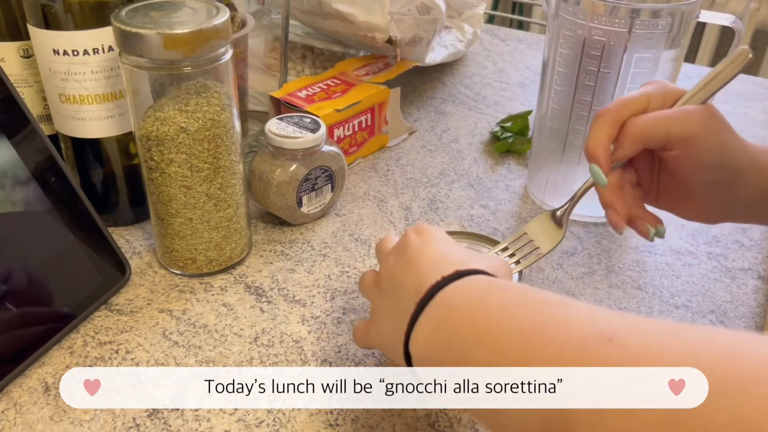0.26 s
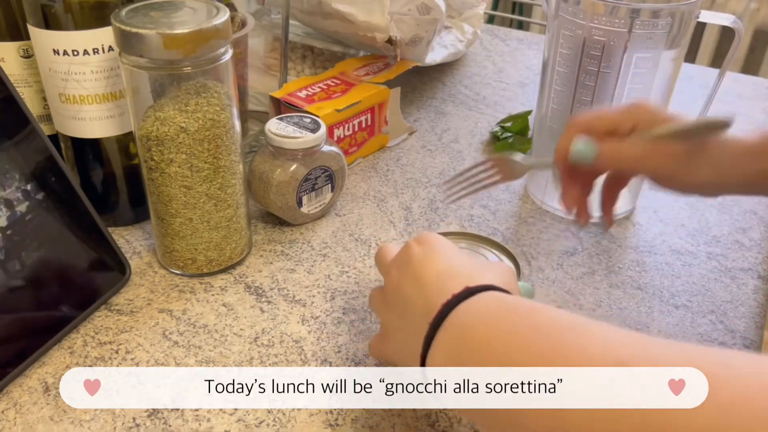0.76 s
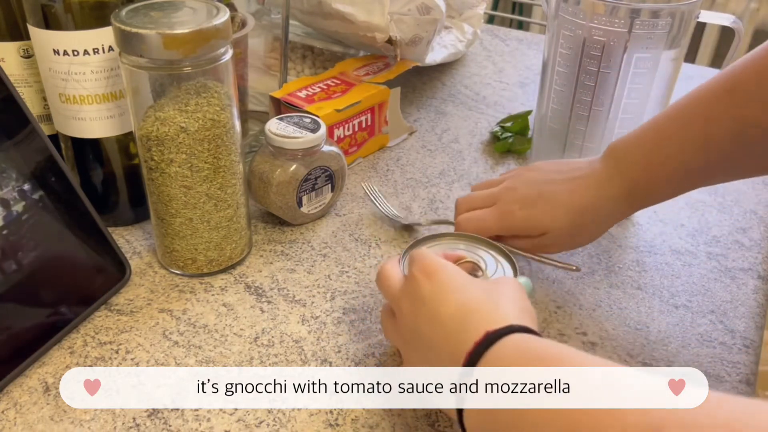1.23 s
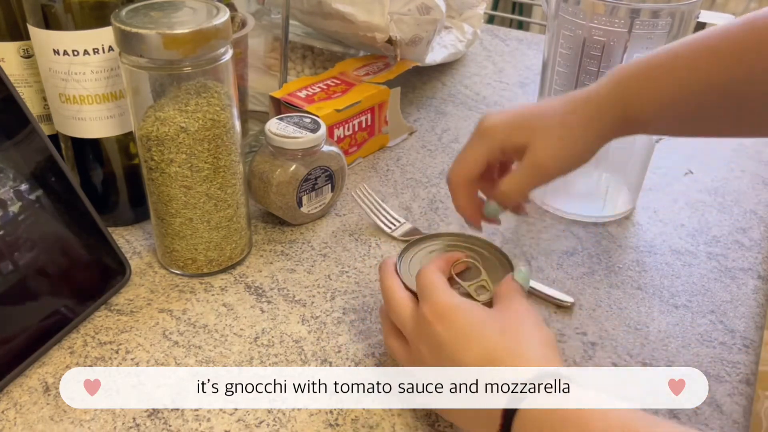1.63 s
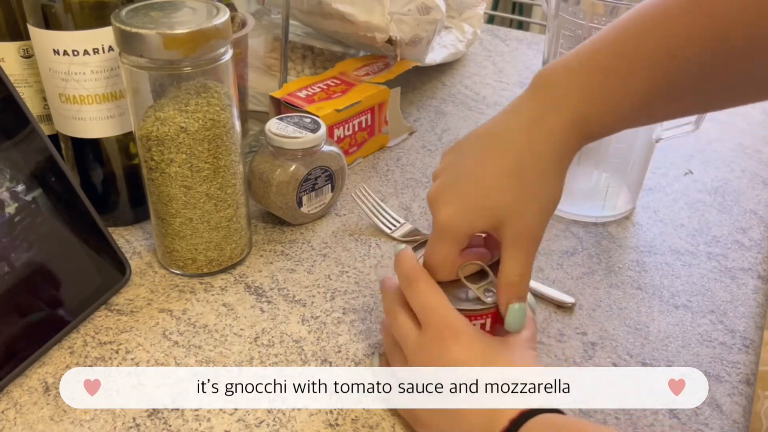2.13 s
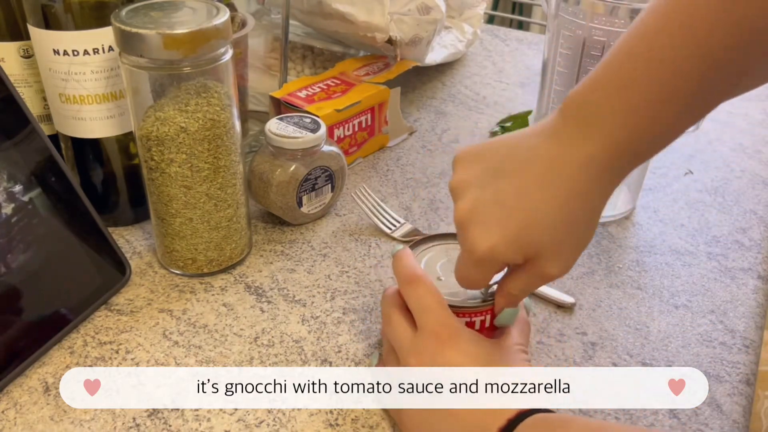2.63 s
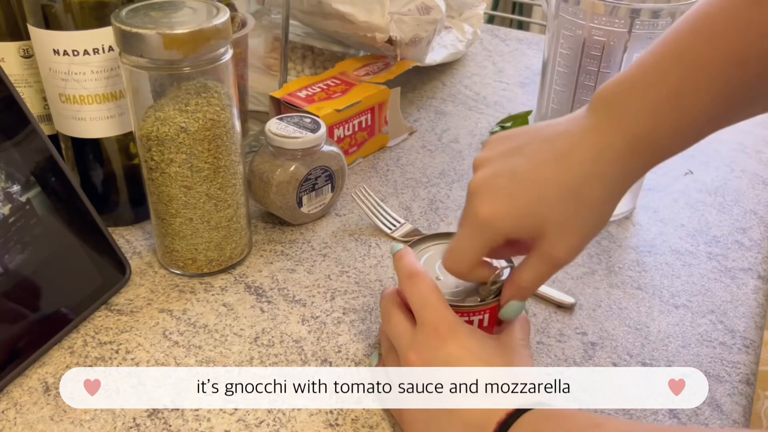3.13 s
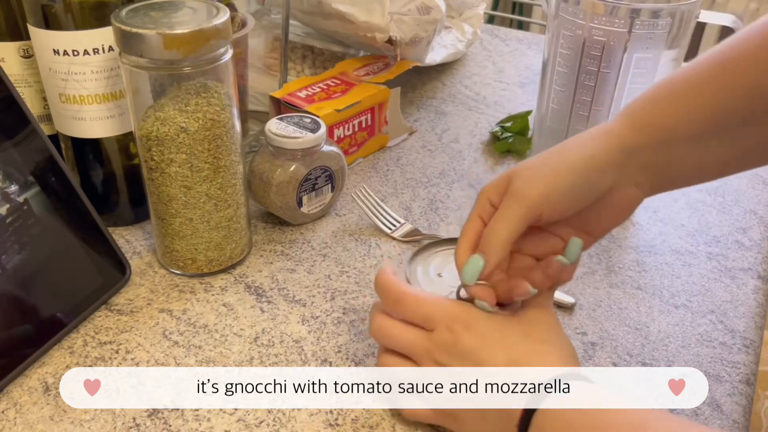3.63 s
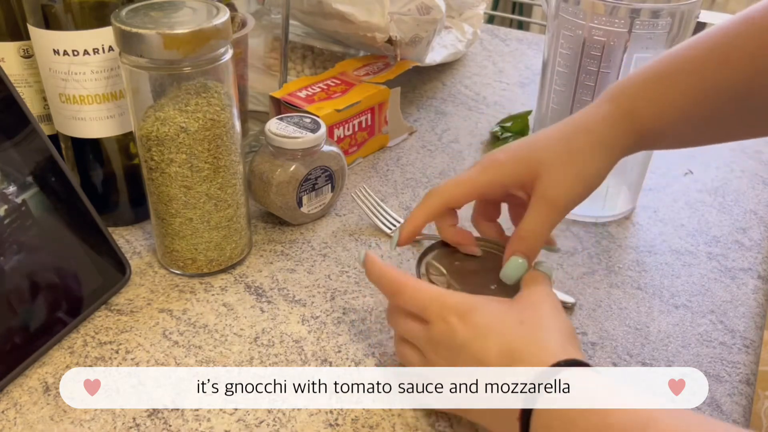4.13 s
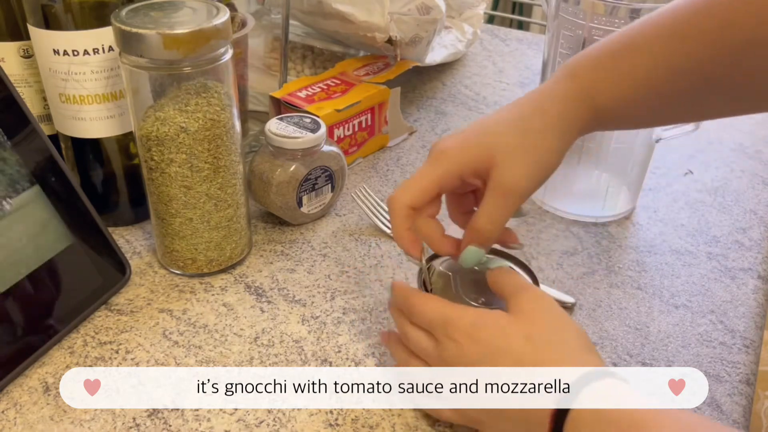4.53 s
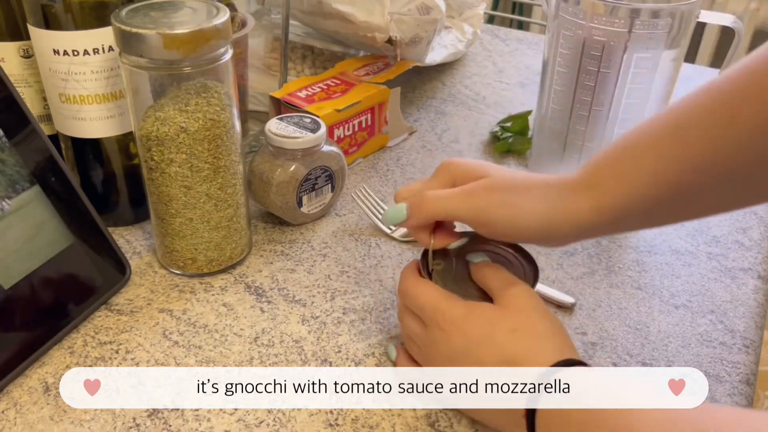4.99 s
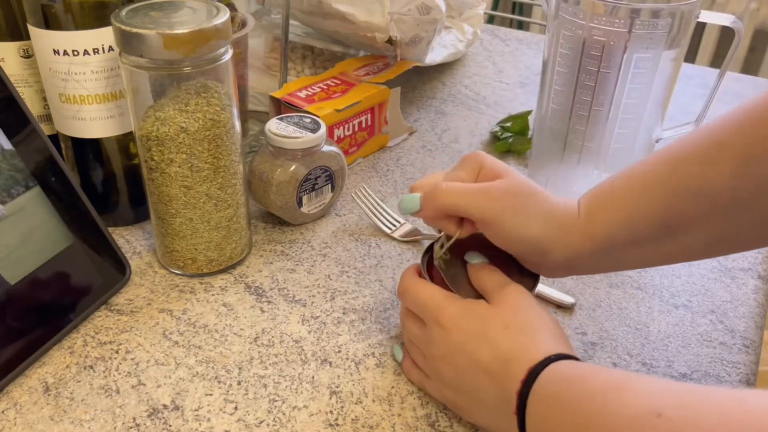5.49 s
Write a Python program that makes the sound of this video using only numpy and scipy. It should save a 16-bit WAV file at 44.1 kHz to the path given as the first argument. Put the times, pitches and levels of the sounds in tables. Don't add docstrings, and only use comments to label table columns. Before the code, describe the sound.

Phone-close sound of hands opening a can on a stone counter. Light metallic ticks come first, a steel fork clatters down and drags with a thin ring, and the can is struck sharply. The pull ring snaps and ticks on the lid while the can scrapes across grit. A short puff of air and dull thud end it, with small creaking slips and a short room echo.

```python
import sys
import numpy as np
from scipy import signal
from scipy.fft import rfft, irfft, next_fast_len
from scipy.io import wavfile
from scipy.ndimage import uniform_filter1d

SR = 44100
rng = np.random.default_rng(int(sys.argv[2]) if len(sys.argv) > 2 else 0)


def unload_wav(signal):
    wavfile.write(
        sys.argv[1],
        SR,
        np.round(np.clip(np.atleast_2d(signal).T, -1, 1) * 32767).astype(np.int16),
    )


def how_loud(loudness_db):
    steps = np.asarray(loudness_db, float) / 20
    return 10 ** steps


N = 253575


def unit(x):
    return x / np.sqrt(np.mean(x ** 2) + 1e-20)


def peak(x):
    return x / np.max(np.abs(x))


def add(out, start_s, sound):
    out[round(start_s * SR):][:len(sound)] += sound


def decay(t, t60_s):
    return how_loud(-60 * t / t60_s)


def along(points, hz):
    f, v = np.transpose(points)
    return np.interp(np.log(hz + 1), np.log(f + 1), v)


def curves(rows):
    (s, *columns), t = np.transpose(rows), np.arange(N) / SR
    return [how_loud(np.interp(t, s, db, left=-200, right=-200)) for db in columns]


def swells(rows):
    t = np.arange(0, N + 32, 32) / SR
    power = 0
    for s, db, rise, fall in rows:
        distance = np.maximum((s - t) / abs(rise), (t - s) / abs(fall))
        power = power + how_loud(2 * db - 39.6 * distance)
    return np.interp(np.arange(N) / SR, t, np.sqrt(power))


def filtered(x, response):
    m = next_fast_len(x.shape[-1] + SR // 2)
    return irfft(rfft(x, m) * response(np.fft.rfftfreq(m, 1 / SR)), m)[..., :x.shape[-1]]


def shaped(x, points):
    return filtered(x, lambda f: how_loud(along(points, f)))


def body(modes):
    def response(f):
        return sum((-1) ** k * how_loud(db) * 1j * f * w / (c * c - f * f + 1j * f * w)
                   for k, (c, w, db) in enumerate(modes))
    return response


def soft(response, top_hz):
    return lambda f: response(f) / (1 + 1j * f / top_hz) ** 3


def struck(modes, place, hz, sharp, boost_db):
    others = body([(c, w, db + 2.8 * p) for (c, w, db), p in zip(modes, place)])
    favoured = body([(hz, hz / sharp, boost_db)])
    clack = body([(1.3 * hz, 1.6 * hz, -3)])
    return lambda f: others(f) + 1j * favoured(f) + clack(f)


def spread(pair, alike):
    def mix(hz):
        turn = np.arccos(np.clip(along(alike, hz), -1, 1)) / 2
        return np.array([np.cos(turn), np.sin(turn)])
    mid, side = filtered(pair, mix)
    return np.array([mid + side, mid - side])


# f/Hz, level/dB per Hz
AIR_SPECTRUM = [(25, -8.5), (53, -5), (150, 0.5), (790, -19), (2040, -20), (2330, -36), (4130, -46.5),
                (7300, -32), (7800, -25), (9400, -35), (10200, -69), (11200, -41.5), (11700, -13.5),
            (12400, -36.5), (13000, -66)]
# f/Hz, likeness
AIR_ALIKE = [(60, 1), (180, 0.81), (550, 0.8), (1650, 0.012), (4970, 0.13), (15000, 0.016)]


def air():
    noise = shaped(rng.standard_normal((2, N)), AIR_SPECTRUM)
    return how_loud(-64) * unit(spread(noise, AIR_ALIKE))


GATE_DB, GATE_SLOPE, GATE_DEPTH_DB, GATE_S = -68.5, 0.86, 9, 0.099


def gate(dry):
    power = uniform_filter1d(np.mean(dry ** 2, 0), round(GATE_S * SR))
    level_db = 10 * np.log10(np.abs(power) + 1e-12)
    return how_loud(np.clip(GATE_SLOPE * (level_db - GATE_DB), -GATE_DEPTH_DB, 0))


# f/Hz, likeness
ECHO_LIKENESS = [(60, .97), (150, .97), (300, .68), (650, .28), (1400, 0), (3000, .1), (15000, .15)]


def echoes(x, decays, delay_s, size):
    out, x = np.zeros((2, N + 3 * SR)), np.pad(x, (size, 2 * size))
    fade = np.sin(np.pi * (np.arange(2 * size) + 0.5) / (2 * size))
    delay = round(delay_s * SR)
    for start in range(0, N + size, size):
        hz, t, z = signal.stft(rng.standard_normal((2, 3 * size)), SR, nperseg=256)
        tail = signal.istft(z * decay(t, along(decays, hz)[:, None]), SR, nperseg=256)[1]
        tail = tail / np.sqrt(np.sum(tail ** 2) / 2)
        echo = signal.fftconvolve(fade * x[None, start:start + 2 * size], tail, axes=1)
        out[:, start + delay:][:, :echo.shape[1]] += echo
    return spread(out[:, size:N + size], ECHO_LIKENESS)


# t/s, f/Hz, level/dB, t60/s
RESTING_TONES = [
    (1.78, 7000, -57, 0.48),
    (1.8, 5330, -56, 0.44),
    (4.052, 3830, -57, 0.44),
    (1.72, 3480, -44, 0.53),
    (1.87, 2181, -49, 0.61),
    (2.05, 978, -58.5, 0.97),
    (2.42, 838, -38.5, .4),
    (4.3, 730, -57, .8),
]


def hang():
    out, t = np.zeros(N + SR), np.arange(SR // 2) / SR
    onset = 1 - np.exp(-t / 0.016)
    for s, hz, db, t60 in RESTING_TONES:
        add(out, s, how_loud(db) * decay(t, t60) * onset * np.sin(2 * np.pi * hz * t))
    return out[:N]


# t/s, peak level/dB, share of the highest tine pair/dB
FORK_STRIKES = [
    (1.091, -29, -14.5),
    (1.5117, -24.5, 4.5),
    (1.5651, -36.5, 13.5),
]
# f/Hz; their level/dB, t60/s
TINE_TONES_HZ = [2842, 4177, 7736, 9593, 10720, 15320]
TINE_DECAYS = [(-15, .2), (-16, 0.11), (-11.5, 0.18), (-13.5, 0.14), (-17.5, 0.37), (-11.5, .1)]
# f/Hz; level/dB, t60/s
PAIR_TONES_HZ = [11855, 11980]
PAIR_DECAYS = [(6.5, 0.31), (2, 0.36)]


def fork():
    out, t = np.zeros(N + SR), np.arange(SR // 2) / SR

    def ring(freqs_hz, modes):
        return sum(how_loud(db) * decay(t, t60) * np.sin(2 * np.pi * hz * t)
                   for hz, (db, t60) in zip(freqs_hz, modes))

    tines, pair = ring(TINE_TONES_HZ, TINE_DECAYS), ring(PAIR_TONES_HZ, PAIR_DECAYS)
    for s, db, pair_db in FORK_STRIKES:
        add(out, s, how_loud(db - 17.5) * (tines + how_loud(pair_db) * pair))
    return out[:N]


# peak t/s, scrape level/dB, rise/s per 20 dB, fall/s per 20 dB, weight on slab/dB
CAN_PUSHES = [(-.02, -51.5, 2, 0.06, 6), (0.151, -48, 0.1, 0.18, 5.5), (.907, -60.5, 0.16, 0.3, 6.5),
              (1.36, -45.5, -0.03, 0.26, -18.5), (2.01, -29.5, 0.1148, 0.0752, -3),
              (2.2, -57.5, -0.5, 0.9, -8), (2.825, -53.5, 1.5, -0.1, -1.5), (3.063, -53, .11, 0.3, -4),
              (3.39, -50, 0.17, .15, -3), (3.5, -44.5, 0.12, 0.14, -6), (3.6, -30, 0.1052, 0.03, -5.5),
              (3.636, -21, 0.0541, 0.0638, -11), (3.671, -27.5, 0.05, 0.09, -7.5),
              (3.79, -29, 0.2751, 0.13, -9.5), (4.16, -39, 0.11, 0.03, -6),
              (4.22, -28.5, 0.06, 0.0732, -9.5), (4.245, -29, 0.0938, 0.0752, -12),
              (4.31, -37, .03, 0.05, -8), (4.564, -52, 0.22, 0.18, 2.5), (4.7, -45, 0, 0.08, -2.5),
              (4.86, -39, 0.09, 0.1, -7), (4.9, -45.5, 0.07, 0.09, -5), (4.969, -46.5, 0.35, 0.02, 3.5),
              (5.75, -31, 0.0066, .04, 8)]
# t/s, scrape level/dB, fall/s per 20 dB, weight/dB, grit level/dB
CAN_JOLTS = [(0.367, -37, 0.02, -5, -51), (0.461, -48.5, -0.06, 0.5, -51.5),
             (1.091, -55.5, 0.24, 12.5, -50), (1.192, -35, 0.18, -13.5, -59.5),
             (2.358, -30.5, 0.0035, -4.5, -62.5), (2.421, -27, 0.08, -12.5, -33),
             (3.11, -40, 0.07, -19, -56), (4.01, -43.5, 0.1, -14, -57.5), (4.502, -44.5, 0.27, -3.5, -72),
             (4.803, -39, 0.18, -10, -70), (5.365, -21.5, 0.1, -5.5, -38.5)]
# peak t/s, grit level/dB, rise/s per 20 dB, fall/s per 20 dB, relative rustle/dB
FINGER_BRUSHES = [(.188, -68.5, 0.15, 0.8, -3.5), (1.37, -57, 0.06, 0.06, -29),
                  (1.44, -59.5, 0.15, .2, -20), (1.96, -58.5, 0.17, 0.4, -11), (2.25, -65.5, 1.5, 0.7, -39),
                  (2.428, -52.5, -0.06, 0.11, 2), (.47, -62.5, 0.15, .1, 5), (2.67, -62.5, 0.1, 0.17, -9.5),
                  (3.09, -60, 0.18, 0.5, -9.5), (3.43, -78, -1.5, 1.6, 7), (3.485, -55, -0.02, 0.22, -15),
                  (3.53, -46, 0.06, 0.2, -21), (3.64, -52, .1, 0.18, -13), (3.8, -58, 0, -0.17, -12),
                  (4.06, -51.5, 0.01, 0.6, -14), (4.32, -61, 0.3, -0.86, -13),
                  (4.433, -73, -0.5, 0.56, -7.5), (4.78, -62, -0.56, 0.45, -19.5),
                  (5.75, -53.5, 0.07, 5, -14)]
# peak t/s, level/dB, rise/s per 20 dB, fall/s per 20 dB
WRIST_LEANS = [
    (.16, -49.5, 0.2, 0.15),
    (1.1, -50, 0.18, 0.06),
    (2.46, -44, 0.13, 0.16),
    (3.63, -36, 0.13, 0.2),
    (4.15, -48.5, 0.1, 0),
    (4.26, -40, 0.23, .12),
    (4.585, -46, -0.2, 0.1),
    (4.96, -45, 0, .1),
]
# t/s, pressure/dB, speed/dB
FORK_SWEEP = [
    (1.451, -18, -27),
    (1.465, -25, -39),
    (1.507, -17.5, -27.5),
    (1.514, -20.5, -21.5),
    (1.6, -19, -21),
    (1.699, -18, -24),
    (1.829, -26.5, -42.5),
    (1.951, -43, -59),
    (2.2, -91, -83.5),
]
SWEEP_WEIGHT_DB, SWEEP_GRIT_DB, SWEEP_RUSTLE_DB = -16.5, -19, -17.5
SLAB_LAG_S, SLAB_SLOWER = 0.037, 1.13
SNAP_S = 0.0029
JOLT_SLAB_S, JOLT_GRIT_S, JOLT_RUSTLE_DB = 0.15, 0.16, -19
HOLLOW_BY_WEIGHT = 0.7


def motion():
    moves = CAN_PUSHES + [(s, db, SNAP_S, fall, weight) for s, db, fall, weight, _ in CAN_JOLTS]
    pressure, speed = curves(FORK_SWEEP)
    scrape = swells([m[:4] for m in moves]) + pressure
    pressed = [(s, db + HOLLOW_BY_WEIGHT * weight, rise, fall) for s, db, rise, fall, weight in moves]
    hollow = swells(pressed) + how_loud(-13) * pressure
    leaned = [(s + SLAB_LAG_S, db + weight, SLAB_SLOWER * rise, SLAB_SLOWER * fall)
              for s, db, rise, fall, weight in CAN_PUSHES]
    shaken = [(s, db + weight, SNAP_S, JOLT_SLAB_S) for s, db, _, weight, _ in CAN_JOLTS]
    slab = swells(leaned + shaken + WRIST_LEANS) + how_loud(SWEEP_WEIGHT_DB) * pressure
    jolted = [(s, db, SNAP_S, JOLT_GRIT_S, JOLT_RUSTLE_DB) for s, *_, db in CAN_JOLTS]
    fine = FINGER_BRUSHES + jolted
    grit = swells([b[:4] for b in fine]) + how_loud(SWEEP_GRIT_DB) * speed
    rustle = swells([(s, db + dry_db, rise, fall) for s, db, rise, fall, dry_db in fine])
    rustle = rustle + how_loud(SWEEP_GRIT_DB + SWEEP_RUSTLE_DB) * speed
    return scrape, hollow, slab, speed, grit, rustle


def bumps(rate_hz, scatter_db):
    hit = rng.random(N) < rate_hz / SR
    return unit(hit * rng.standard_normal(N) * how_loud(scatter_db * rng.exponential(size=N)))


# f/Hz, width/Hz, level/dB
SLIDING_CAN = [(655, 70, 11), (738, 29, 8), (1093, 48, -0.5), (1265, 25, 11), (1400, 70, 0), (1725, 18, 6),
               (2060, 88, -8.5)]
# f/Hz, width/Hz, level/dB
HOLLOW_CAN = [(379, 48.3, -4), (399.5, 50, -4), (512.3, 60, -3.5)]
# f/Hz, width/Hz, level/dB
SLAB = [(70.5, 25, -7), (106, 15, -5.5), (157.7, 22.7, 1)]
# f/Hz, width/Hz, level/dB
DRAGGED_FORK = [(486.5, 49, 1), (651.5, 43, 2), (956, 25, -7), (1246, 50, -1), (1450, 400, -1.5),
                (1712, 31, -2), (2154, 58, -2.5), (2367, 60, -3.5), (2740, 28, -5.5), (3324, 45, -5),
                (3480, 9, -4.5), (5330, 50, -12), (6500, 1200, -12.5), (7000, 40, -12)]
# f/Hz, width/Hz, level/dB
BENDING_LID = [(380, 44, 5.5), (1290, 140, -16), (1900, 210, -19), (2700, 340, -15.5)]
# f/Hz, level/dB per Hz
GRIT_SPECTRUM = [(2000, -47), (2900, -10.5), (4700, -12), (5300, -5), (5900, -8.5), (7000, -12),
                 (9000, -14), (10000, -37)]
# f/Hz, level/dB per Hz
RUSTLE_SPECTRUM = [(10500, -39), (11600, -1.5), (13000, -4), (15000, -8.5), (15900, -33)]
# peak t/s, level/dB, rise/s per 20 dB, fall/s per 20 dB
LID_SLIPS = [
    (5.44, -48, 0.061, 0.34),
    (5.585, -43.5, .05, .04),
    (5.62, -45, .02, .04),
    (5.652, -48.5, .03, .04),
    (5.685, -50, .03, .05),
    (5.712, -46, .03, .04),
]


def slide():
    scrape, pressed, leaned, speed, grit, rustle = motion()
    shake = bumps(rate_hz=4500, scatter_db=0.6)

    def rung(gain, response):
        return filtered(gain * shake, response) / np.std(filtered(shake, response))

    def fine(spectrum):
        return unit(shaped(bumps(rate_hz=9000, scatter_db=1.2), spectrum))

    can, can_dense = body(SLIDING_CAN), body([(1180, 690, 6.3)])
    steel, steel_dense = body(DRAGGED_FORK), body([(2000, 2600, -3)])
    rim = soft(lambda f: can(f) + can_dense(f), top_hz=2700)
    out = rung(swells(LID_SLIPS), soft(body(BENDING_LID), top_hz=3000))
    out += rung(how_loud(-5.5) * scrape, soft(rim, top_hz=3000))
    out += rung(how_loud(-5) * pressed, soft(body(HOLLOW_CAN), top_hz=920))
    out += rung(how_loud(-5) * leaned, soft(body(SLAB), top_hz=410))
    out += rung(how_loud(3.5) * speed, soft(lambda f: steel(f) + steel_dense(f), top_hz=4300))
    return out + how_loud(-4) * (grit * fine(GRIT_SPECTRUM) + rustle * fine(RUSTLE_SPECTRUM))


# f/Hz, width/Hz, level/dB
CAN_SHELL = [(626, 45, -23.5), (844, 13, -10.5), (1214, 90, -7), (1350, 89, 2.5), (1880, 240, -6.5),
             (2100, 140, -8.5), (2343, 90, -7.5), (2784, 89, -10)]
# t/s, peak level/dB, shell f/Hz, relative thump/dB, thump f/Hz
DULL_KNOCKS = [(0.392, -35, 1490, -6, 139), (0.465, -39, 283, -12, 106.5), (1.093, -42, 500, -40, 169.4),
               (1.191, -21.5, 420, -32, 168), (1.449, -20.5, 560, -29.5, 111.4),
               (2.019, -33.5, 530, -3, 148), (2.358, -37, 818, -12, 169), (2.423, -20, 1290, -25.5, 185.7),
               (4.503, -35.5, 1110, -41.5, 156), (4.54, -30, 490, -28, 156.4), (4.855, -36, 539, -33, 84.4),
               (5.3655, -19.5, 435, -10.5, 87)]


def knocks():
    out, t = np.zeros(N + SR), np.arange(SR // 3) / SR
    envelope = (1 - np.exp(-t / 0.002)) * decay(t, 0.028)
    for s, db, shell_hz, thump_db, thump_hz in DULL_KNOCKS:
        burst, place = rng.standard_normal(len(t)) * envelope, rng.standard_normal(8)
        clunk = struck(CAN_SHELL, place, shell_hz, sharp=5.6, boost_db=5)
        shell = peak(filtered(burst, soft(clunk, top_hz=1460)))
        thump = peak(filtered(decay(t, 0.048), soft(body([(thump_hz, 22, 0)]), top_hz=504)))
        add(out, s, how_loud(db - 2) * (shell + how_loud(thump_db) * thump))
    return out[:N]


# f/Hz, level/dB, t60/s
RING_TONES = [(1117, -10.5, 0.13), (2170, -10.5, .06), (2900, -7.5, 0.05), (3760, -3, 0.069)]
# t/s, level/dB
RING_SLIPS = [
    (2.663, -59.5),
    (2.8003, -65),
    (3.1115, -38),
    (4.0494, -47),
]
TWANG_SPREAD = 0.019


def twang():
    out, t = np.zeros(N + SR), np.arange(SR // 3) / SR
    for s, db in RING_SLIPS:
        factor = 1 + TWANG_SPREAD * rng.standard_normal((6, 1))
        tones = [how_loud(level) * decay(t, t60) * np.sin(2 * np.pi * hz * factor * t).mean(0)
                 for hz, level, t60 in RING_TONES]
        add(out, s + 0.000985, how_loud(db + 6.5) * sum(tones))
    return out[:N]


# f/Hz, width/Hz, level/dB
SCRATCH_MODES = [(11630, 930, 0.5), (13010, 1100, -1.5), (14980, 1400, -2)]
# t/s, peak level/dB, length/ms
SCRATCHES = [(0.192, -45, 6), (.3675, -32.5, 12.3), (.4628, -42, 14), (1.091, -39.5, 40), (1.45, -45.5, 5),
             (1.5125, -30, 10), (1.5585, -33, 8), (2.0638, -66, 6), (2.125, -58, 8), (2.3585, -37.5, 9),
             (2.421, -20.5, 9.2), (2.6628, -56, 6), (2.801, -53, 6.2), (3.1105, -31, 5.9),
             (3.4085, -41.5, 8.9), (4.0065, -57, 5), (4.01, -43, 11), (4.0488, -40.5, 6.2),
             (4.0983, -43.5, 9), (4.1663, -42, 12), (4.2995, -43, 12), (4.3852, -56, 5), (4.4365, -46, 6),
             (4.9851, -58, 6)]
EDGE_RISE_S = 0.00065


def edges():
    out, t = np.zeros(N + SR), np.arange(SR // 10) / SR
    modes, band = body(SCRATCH_MODES), body([(13300, 4500, 0)])
    for s, db, ms in SCRATCHES:
        burst = rng.standard_normal(len(t)) * (1 - np.exp(-t / EDGE_RISE_S)) * how_loud(-30e3 * t / ms)
        scratch = peak(filtered(burst, lambda f: modes(f) * band(f) ** 2))
        add(out, s - EDGE_RISE_S, how_loud(db + 1.5) * scratch)
    return out[:N]


# f/Hz, width/Hz, level/dB
LID_MODES = [(2890, 61, -9.5), (3780, 130, -2.5), (4600, 55, -11), (5730, 120, -9.5), (7200, 2300, -10.5)]
# t/s, peak level/dB, lid f/Hz, relative shell/dB, shell f/Hz
SHARP_TICKS = [(0.1914, -49, 4660, 4, 400), (0.3678, -38, 6500, 5, 1840), (0.4625, -39.5, 5970, -7, 1170),
               (1.0902, -39.5, 3050, -3, 504), (2.0632, -55.5, 5330, -8, 432),
               (2.1245, -60.5, 5040, 2, 432), (2.358, -41.5, 3800, 9.5, 776), (2.4203, -19, 7200, 3, 1745),
               (2.4214, -18.5, 4700, 5, 2360), (2.4235, -20, 2450, 3.5, 830), (2.801, -48.5, 3480, 3, 386),
               (3.1098, -31, 3660, -1, 1940), (3.4071, -48.5, 6600, -8, 502),
               (4.0065, -44.5, 3000, 2, 1900), (4.0096, -37, 3470, 1.5, 1290),
               (4.0487, -36, 3780, -3.5, 630), (4.097, -34.5, 3820, -7.5, 1010),
               (4.166, -36, 2630, 3, 1180), (4.2985, -39.5, 3220, 0.5, 477), (4.4361, -40, 6730, -11, 722),
               (4.9851, -52, 4568, 4, 570)]
# t/s, peak level/dB, lid f/Hz, relative shell/dB, shell f/Hz
BLUNT_TAPS = [(1.2782, -55.5, 3070, 6.5, 430), (1.4494, -28, 5520, 6.5, 1352),
              (1.5126, -18, 6500, -3, 1260), (1.4916, -28, 2723, 6, 985), (1.5122, -14.5, 2700, 1, 1400),
              (1.5195, -18, 2305, 1, 903), (1.5636, -20.5, 6810, 0, 2400), (1.563, -17, 2400, 2, 1100),
              (1.6286, -23, 2900, 4, 1334), (2.6621, -42.5, 3650, -5, 425), (4.3845, -51, 4870, -20, 430),
              (5.3511, -31.5, 4800, 2, 1947), (5.3633, -28, 3180, 8.5, 1280),
              (5.5835, -49.5, 2760, 3, 1900), (5.609, -46, 2380, -3, 428), (5.6387, -62, 2650, -2, 430),
              (5.6932, -52, 2620, -3, 1900), (5.7329, -42, 2700, -2.5, 1350),
              (5.743, -43.5, 2740, -3, 1350)]
SHARP_TOP, BLUNT_TOP = 3.9, 1.45
TAP_T60_S, TAP_SPIKE = 0.0043, 2.5


def taps():
    out, t = np.zeros(N + SR), np.arange(SR // 4) / SR
    hits = [(*h, SHARP_TOP) for h in SHARP_TICKS] + [(*h, BLUNT_TOP) for h in BLUNT_TAPS]
    for s, db, lid_hz, shell_db, shell_hz, top in hits:
        place = rng.standard_normal(16)
        burst = (rng.standard_normal(len(t)) + TAP_SPIKE * (t == 0)) * decay(t, TAP_T60_S)
        lid_body = struck(LID_MODES, place, lid_hz, sharp=14, boost_db=8)
        shell_body = struck(CAN_SHELL, place[6:], shell_hz, sharp=7.7, boost_db=4.5)
        lid = peak(filtered(burst, soft(lid_body, top_hz=top * lid_hz)))
        shell = peak(filtered(burst, soft(shell_body, top_hz=2916)))
        add(out, s + 0.0008, how_loud(db + 3.5) * (lid + how_loud(shell_db) * shell))
    return filtered(out[:N], lambda f: 1 - body([(10000, 2500, -1.5)])(f))


# f/Hz, level/dB per Hz
JET_SPECTRUM = [(1000, -37), (1950, 3.5), (3300, -19), (4800, -6.5), (7000, -3), (12000, -11),
                (16000, -24.5)]
LEAK_S, LEAK_DB, BURST_S, BURST_DB, SEALED_S = 5.319, -57.5, 5.345, -28, 5.366


def seal():
    t = np.arange(N) / SR
    flow = (t > LEAK_S) * (t < SEALED_S) * how_loud(np.where(t < BURST_S, LEAK_DB, BURST_DB))
    return uniform_filter1d(flow, size=150) * unit(shaped(rng.standard_normal(N), JET_SPECTRUM))


# f/Hz, t60/s
NEAR_DECAYS = [(100, 0.017), (1000, 0.048), (10000, 0.022)]
# f/Hz, t60/s
WALL_DECAYS = [(100, 0.61), (500, 0.39), (1800, 0.71), (3500, 0.47), (6000, 0.11), (14000, 0.2)]
# f/Hz, level/dB
DIFFUSE_SHADE = [(7500, -1.5), (8900, -6.5), (9400, -40), (10800, -20.5), (11500, 2)]


def scene():
    rubbing = slide() + seal()
    blows = taps() + knocks() + twang()
    ringing = fork() + hang()
    dry = edges()
    to_near = rubbing + how_loud(-2.5) * blows + how_loud(-4) * ringing + how_loud(-8) * dry
    to_walls = how_loud(-10) * rubbing + how_loud(-2) * blows + how_loud(0.5) * ringing + how_loud(-8) * dry
    near = echoes(to_near, NEAR_DECAYS, delay_s=0.0015, size=SR // 20)
    far = echoes(to_walls, WALL_DECAYS, delay_s=0.0055, size=SR // 4)
    shaded = shaped(near + far + how_loud(-11) * rubbing, DIFFUSE_SHADE)
    return (blows + ringing + shaded) * how_loud([[0.8], [-0.8]]) + dry


def top_cut(x):
    return signal.sosfilt(signal.butter(12, 17010, fs=SR, output="sos"), x)


# f/Hz, level/dB
MIC_RESPONSE = [(25, -28.5), (60, 1.5), (15500, 0), (16600, -19.5), (17000, -88.5)]


def record(dry):
    heard = shaped(dry, MIC_RESPONSE) + gate(dry) * air()
    limited = heard / (1 + np.abs(heard / 0.93) ** 6) ** (1 / 6)
    return top_cut(limited)


dry = scene()
out = record(dry)
unload_wav(out)
```